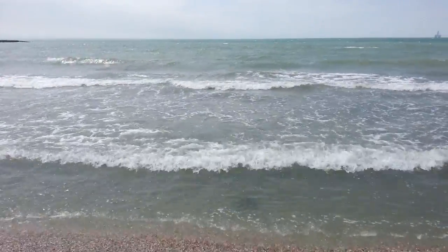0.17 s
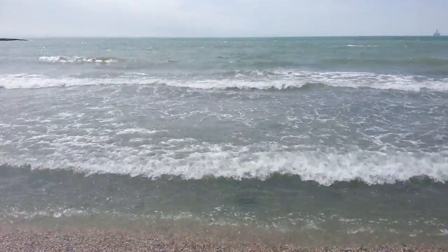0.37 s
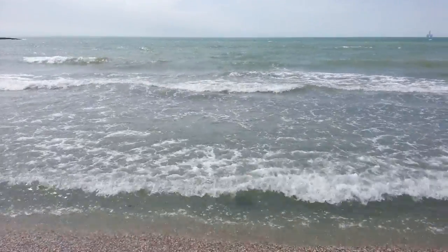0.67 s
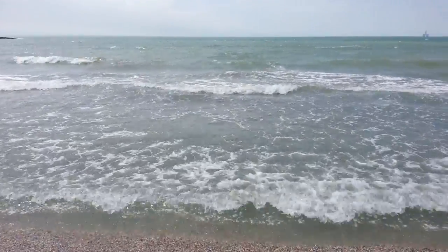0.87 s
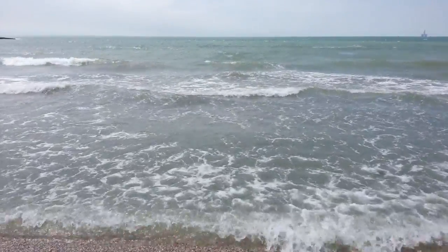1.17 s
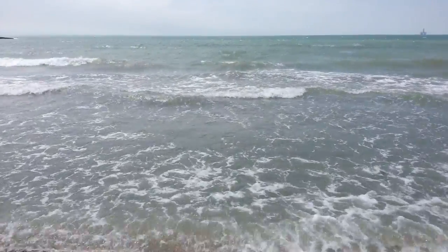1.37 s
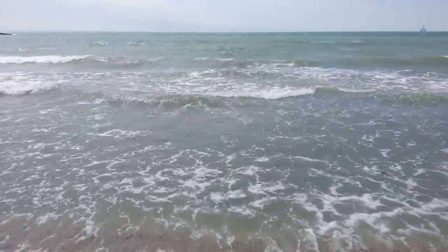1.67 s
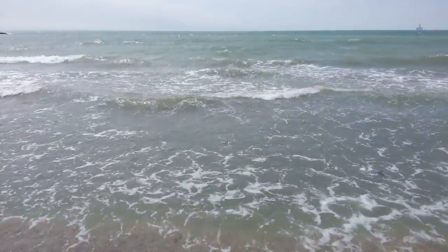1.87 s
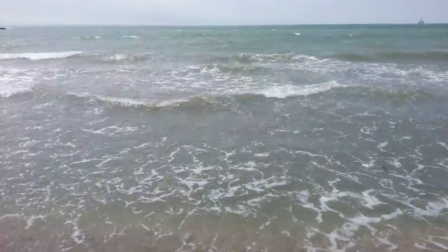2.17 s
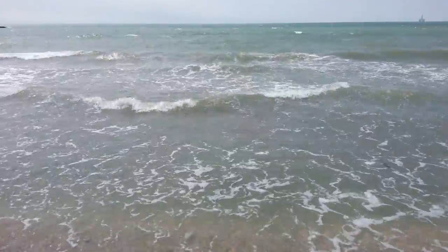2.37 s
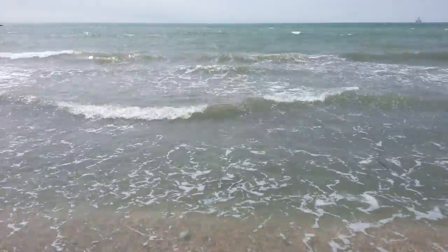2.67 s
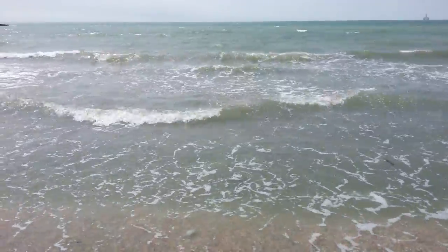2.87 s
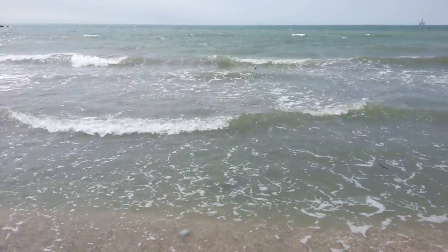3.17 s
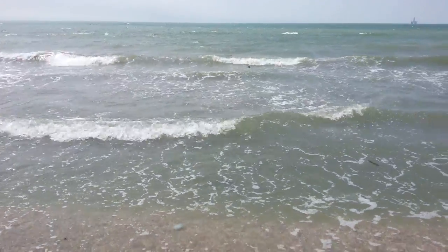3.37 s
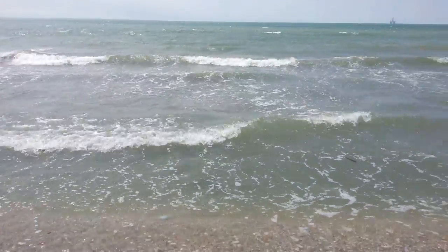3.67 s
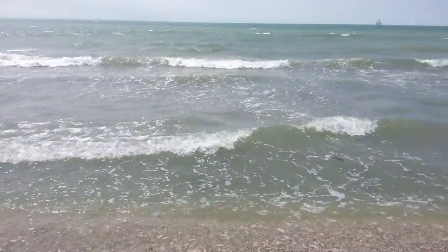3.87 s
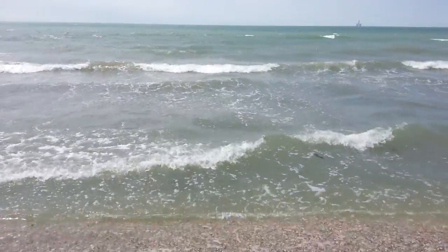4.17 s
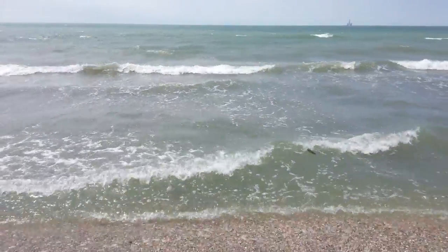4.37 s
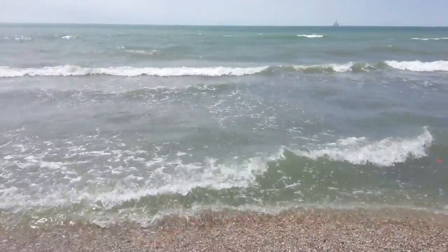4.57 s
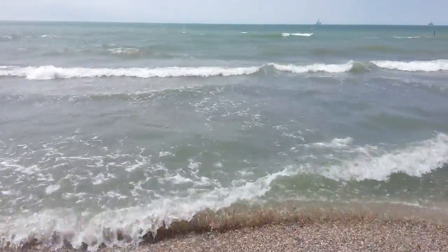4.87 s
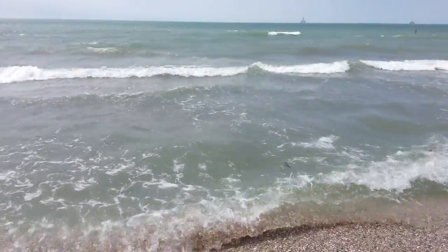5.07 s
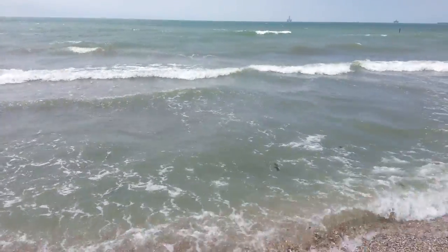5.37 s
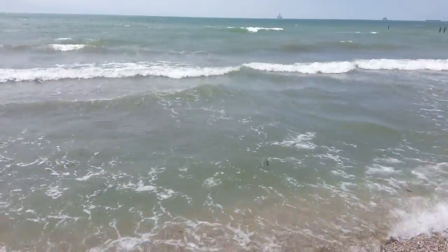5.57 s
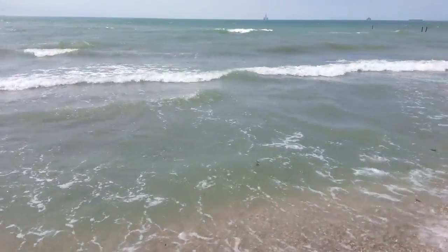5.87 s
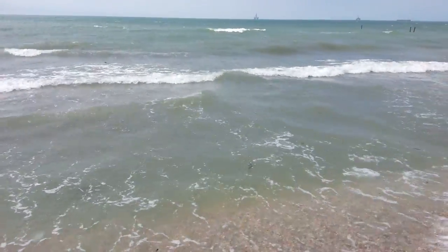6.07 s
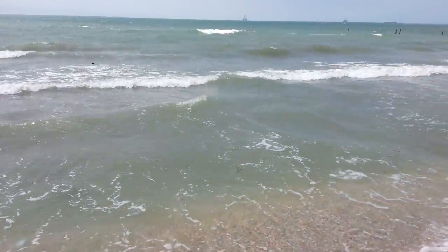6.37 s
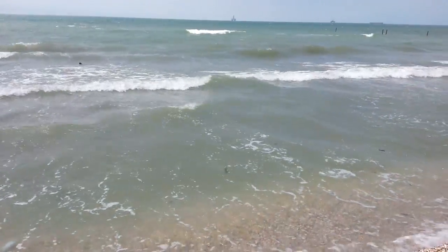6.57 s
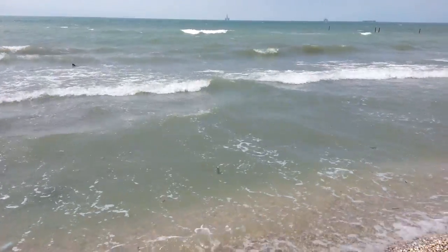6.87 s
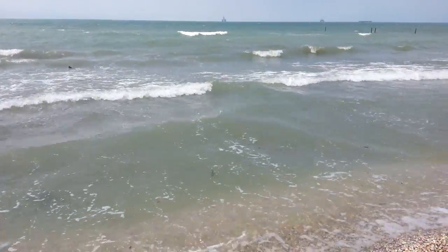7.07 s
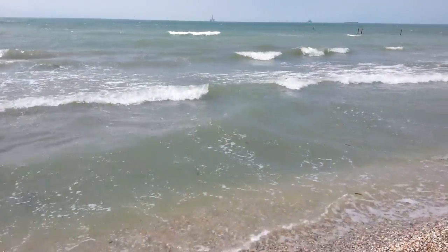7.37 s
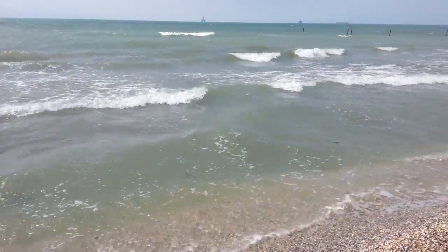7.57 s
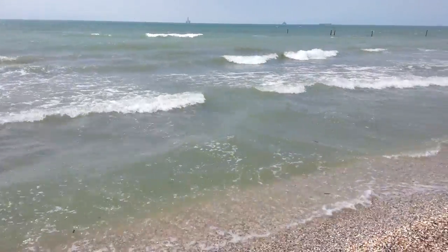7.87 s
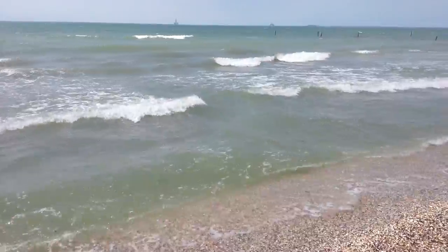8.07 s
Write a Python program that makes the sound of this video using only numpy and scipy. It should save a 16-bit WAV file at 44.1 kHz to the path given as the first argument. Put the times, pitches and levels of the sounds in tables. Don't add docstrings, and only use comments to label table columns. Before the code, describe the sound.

Small waves break and fizz on a shell and pebble beach while rising wind buffets the microphone, growing rough and gradually covering the surf.

```python
import sys
import numpy as np
from scipy import signal
from scipy.fft import rfft, irfft, next_fast_len
from scipy.io import wavfile
from scipy.ndimage import uniform_filter1d, map_coordinates

SR = 44100
rng = np.random.default_rng(int(sys.argv[2]) if len(sys.argv) > 2 else 0)


def linear_from_db(decibels):
    return 10 ** (np.asarray(decibels, float) / 20)


def generate_wav(signal):
    frames = np.transpose(np.atleast_2d(signal))
    scaled = np.clip(frames, -1, 1) * 32767
    pcm = np.round(scaled).astype(np.int16)
    wavfile.write(sys.argv[1], SR, pcm)


N = 362943

# time in seconds, level in dB.
SURF_LEVEL = [(0, -25), (1.0, -25), (1.2, -27), (1.4, -26), (1.6, -25.5), (2.05, -25), (2.2, -26.5),
              (2.8, -29), (3.6, -25.5), (3.8, -28), (4.85, -29.5), (4.98, -26.5), (5.6, -25.5),
              (5.7, -32.5), (5.8, -28.5), (6.1, -33.5), (7.2, -35.5), (8.23, -37.5)]
# centre in seconds, lift in dB, length in ms.
SPRAY_CRESTS = [
    (.4, 0.5, 170),
    (1.4, -1, 53),
    (1.9, 3, 330),
    (2.4, 2.5, 170),
    (5.0, 0.5, 140),
    (5.56, 3.5, 200),
    (6.3, -0.5, 40),
    (8.1, 1.5, 370),
]
# frequency in Hz, response in dB.
OPEN_PORT_COLOUR = [(60, -5.5), (250, -4), (700, 1), (1400, -3), (2000, -4.5), (2700, -3.5), (3300, -2),
                    (4000, -0.5), (5000, -4), (6000, -11.5), (7500, -8.5), (9500, -13), (12500, -23.5),
                    (14600, -22), (14900, -62)]
SHADED_PORT_COLOUR = [(60, -15), (300, -11), (700, 1.5), (900, -4), (1700, -8), (2200, -5.5), (2600, -9),
                      (3000, -17), (5200, -25), (6300, -35), (7500, -27.5), (11500, -29.5), (12500, -72),
                      (15000, -83)]
# time in seconds, strength in dB, left over right in dB, gustiness in dB.
WIND_COURSE = [(0, -28, -4, 0), (.45, -25.5, 2, 1), (.85, -24, -3.5, -0.5), (1.15, -19.5, 6.5, 0.5),
               (1.5, -16.5, 10.5, 0), (1.7, -17, 17, -3), (2.2, -17, 14.5, -3), (2.6, -19, 9, 0),
               (2.85, -20, 6.5, 2), (3.4, -18, 12.5, 0), (3.65, -18, 8, -3), (4.3, -15.5, 16, 1),
               (4.9, -14.5, 11, -2), (5.25, -18.5, 13, 5), (5.37, -14.5, 6, -1.5), (6.3, -13.5, 4, 0),
               (7.0, -14, 2, -1), (8.23, -15, -2.5, -0.3)]
# frequency in Hz, level in dB per Hz.
BUFFET_SPECTRUM = [(20, -55), (45, -31), (130, -7), (200, -2), (290, -1), (420, -5), (600, -12.5),
                   (1000, -21), (2000, -91)]
# frequency in Hz, level in dB per Hz.
LEFT_RASP_SPECTRUM = [(150, -25), (400, 1.5), (600, 2), (900, -8), (1400, -17.5), (2500, -28), (6000, -58)]
RIGHT_RASP_SPECTRUM = [(150, -33), (450, 2.5), (700, 1), (1200, -3), (2000, -9.5), (3500, -19), (5000, -31),
                       (6500, -49), (12000, -82)]
# centre in seconds, level in dB, length in ms.
LEFT_PORT_PUFFS = [(0.062, -13.5, 16), (0.172, -21, 17), (0.501, -19, 29), (0.769, -13, 13),
                   (0.799, -11, 9), (2.409, -14, 14), (2.567, -8, 9.7), (2.592, -14, 8.8), (2.726, -10, 9),
                   (2.917, -14, 6.3), (3.029, -12, 24), (3.145, -4.5, 19), (3.725, -4, 8.1),
                   (3.803, -21, 10), (3.832, -7.5, 9.4), (3.861, -9, 7), (4.514, -3.5, 9.2),
                   (5.155, -6, 6.7), (5.35, -8, 10), (5.377, -6, 11), (6.846, -5, 9.3)]
RIGHT_PORT_PUFFS = [(0.032, -9.5, 11.5), (0.176, -12.5, 17), (0.305, -10.5, 14), (0.505, -10.5, 18),
                    (0.755, -13, 11), (1.476, -6, 11), (1.8, -17.3, 9), (2.119, -14, 11), (2.43, -12, 9.9),
                    (2.55, -10, 7.5), (2.603, -14, 9), (2.837, -10.5, 11), (2.933, -15, 24),
                    (3.556, -18, 9.1), (3.582, -16, 9), (3.612, -10, 13), (3.761, -10, 12),
                    (4.092, -10, 10), (4.228, -17, 13), (4.36, -12, 9), (4.474, -9, 11), (4.757, -10.5, 20),
                    (4.95, -7, 11), (4.985, -13, 6.6), (5.16, -16, 9), (5.342, -10, 19), (6.302, -11, 19),
                    (6.473, -4, 13), (7.048, -6.0, 45), (7.388, -9, 6.9)]
# onset in seconds, peak level in dB, length in ms.
BRIGHT_TEARS = [
    (5.3294, -12, 69),
    (5.8391, -13, 88),
    (6.3155, -7, 87),
    (6.6438, -11, 40),
    (6.8694, -9.5, 60),
    (7.1886, -8, 79),
    (7.3178, -3, 61),
    (8.0985, -25, 55),
]


def unit(x):
    return x / np.sqrt(np.mean(x ** 2, axis=-1, keepdims=True) + 1e-20)


def along(points, hz):
    f, value = np.transpose(points)
    return np.interp(np.log(hz + 1), np.log(f + 1), value)


def curves(rows):
    seconds, *columns = np.transpose(rows)
    return [np.interp(np.arange(N) / SR, seconds, column) for column in columns]


def wobble(rate):
    knots = rng.standard_normal(N // 64)
    return map_coordinates(knots, [np.arange(N) * rate / SR])


def filtered(x, response):
    size = next_fast_len(N + 8192)
    hz = np.fft.rfftfreq(size, 1 / SR)
    return irfft(rfft(x, size) * response(hz), size)[..., :N]


def dense_foam(patchy_db):
    spectrum = signal.stft(rng.standard_normal(N), nperseg=512)[2]
    field = uniform_filter1d(rng.standard_normal(spectrum.shape), size=8, axis=0)
    field = uniform_filter1d(field, size=10, axis=1)
    gain = linear_from_db(patchy_db * field / field.std())
    return unit(signal.istft(spectrum * gain, nperseg=512)[1][:N])


def near_bubbles(count, centre_hz, cycles, spread_db):
    when, size, pitch = rng.random((count, 3)).T
    hz = centre_hz * 2 ** (3 * (pitch - 0.5))[:, None]
    k = np.arange(160)
    turns = hz * k / SR
    ring = np.sin(2 * np.pi * turns * (1 + 0.093 * turns / cycles))
    tone = ring * np.exp(-turns / cycles) * np.sqrt(hz)
    tone = tone * linear_from_db(-spread_db * np.log(size + 0.00072))[:, None]
    places = (when * N).astype(int)[:, None] + k
    return unit(np.bincount(places.ravel(), tone.ravel())[:N])


def foam():
    near = near_bubbles(count=14000, centre_hz=3980, cycles=2.8, spread_db=3)
    return dense_foam(patchy_db=0.56) + linear_from_db(-12) * near


def surf():
    level_db, = curves(SURF_LEVEL)
    t = np.arange(N) / SR
    fizz_db = -0.5
    for centre, lift_db, ms in SPRAY_CRESTS:
        fizz_db = fizz_db + lift_db * np.exp(-0.5 * ((t - centre) / (ms / 2000)) ** 2)
    churn_db = 0.81 * wobble(8) + 0.5 * wobble(20)
    both = np.array([foam(), foam()])
    heard = filtered(both, lambda hz: linear_from_db([along(OPEN_PORT_COLOUR, hz), along(SHADED_PORT_COLOUR, hz)]))
    wash = filtered(heard, lambda hz: 1 / (1 + (hz / 6100) ** 16))
    fizz = heard - wash
    return linear_from_db(level_db + churn_db + 17) * (wash + linear_from_db(fizz_db) * fizz)


def puffs(rows, air):
    size, half = 4096, 2048
    out, k = np.zeros(N + size), np.arange(size)
    for centre, db, ms in rows:
        bell = np.exp(-0.5 * ((k - half) / (0.52 * ms * SR / 1000)) ** 2)
        wanted = round(centre * SR) - half
        start = max(wanted, 0)
        lost = start - wanted
        source = start % (N - size)
        piece = bell * air[:, source:source + size].sum(axis=0)
        piece = linear_from_db(db) * piece * np.linalg.norm(bell) / np.linalg.norm(piece)
        out[start:start + size - lost] += piece[lost:]
    return out[:N]


def port_wind(buffet_db, rasp_db, rasp, rows, lump_db, tear_db, puff_rasp_db):
    air = unit(filtered(rng.standard_normal((4, N)),
                        lambda hz: linear_from_db([along(BUFFET_SPECTRUM, hz), along(rasp, hz)] * 2)))
    lumps = lump_db * (0.9 * wobble(18) + wobble(45))
    thud = unit(linear_from_db(lumps) * air[0])
    tear = unit(linear_from_db(lumps + tear_db * wobble(140)) * air[1])
    gusts = linear_from_db(buffet_db) * (linear_from_db(0.5) * thud + linear_from_db(rasp_db + 2) * tear)
    return gusts + puffs(rows, air[2:] * linear_from_db([[0], [puff_rasp_db]]))


def wind():
    wind_db, veer_db, gusty_db = curves(WIND_COURSE)
    left_share = 1 / (1 + linear_from_db(-2 * veer_db))
    left_db, right_db = wind_db + 6 + 10 * np.log10([left_share, 1 - left_share])
    rasp_db = 1.26 * (right_db + 19) + gusty_db
    left_db = left_db + 0.3 * wobble(5)
    right_db = right_db - 1 + 0.3 * wobble(5)
    left = port_wind(left_db, rasp_db - 26 - left_db, LEFT_RASP_SPECTRUM, LEFT_PORT_PUFFS,
                     lump_db=0.95, tear_db=1.0, puff_rasp_db=-11.0)
    right = port_wind(right_db, rasp_db - 23 - right_db, RIGHT_RASP_SPECTRUM, RIGHT_PORT_PUFFS,
                      lump_db=1.0, tear_db=1.8, puff_rasp_db=-8.5)
    return np.array([left, right])


def tears():
    air = filtered(rng.standard_normal((1, N)),
                   lambda hz: linear_from_db(along(RIGHT_RASP_SPECTRUM, hz)) * hz / (hz + 900))
    air = air * linear_from_db(2.8 * wobble(150))
    return puffs([(onset + 0.03, db - 7.5, ms) for onset, db, ms in BRIGHT_TEARS], air)


def scene():
    gusts = wind()
    gusts[1] += tears()
    return surf() + gusts


def coarse_spectrum(x):
    size, grid = 1024, 432
    k, t = np.arange(size) + 0.5, np.arange(2 * size) + 0.5
    window = np.sin(np.pi * t / (2 * size))[:, None]
    basis = np.sqrt(2 / size) * window * np.cos(np.pi / size * np.outer(t + size / 2, k))
    padded = np.pad(x, ((0, 0), (2 * size - grid, 2 * size - (N - grid) % size)))
    blocks = padded.reshape(2, -1, size)
    lines = np.concatenate([blocks[:, :-1], blocks[:, 1:]], axis=2) @ basis
    power = np.mean(lines[:1, :, size // 8:] ** 2, axis=2, keepdims=True)
    treble_db = 10 * np.log10(uniform_filter1d(power, size=9, axis=1) + 1e-12)
    port_db = np.array([-31, -37])[:, None, None]
    step = linear_from_db(port_db + 11 * k / size + 0.55 * (treble_db - treble_db.mean()))
    rounded = np.sign(lines) * np.floor(np.abs(lines) / step + 0.4) * step
    frames = rounded @ basis.T
    first = np.pad(frames[..., :size], ((0, 0), (0, 1), (0, 0)))
    second = np.pad(frames[..., size:], ((0, 0), (1, 0), (0, 0)))
    return (first + second).reshape(2, -1)[:, 2 * size - grid:][:, :N]


def roll_off(x):
    return signal.sosfilt(signal.butter(12, 15200, fs=SR, output="sos"), x)


def record(dry):
    cut = filtered(dry, lambda hz: hz ** 2 / (hz ** 2 + 55 ** 2))
    clipped = cut / (1 + np.abs(cut / 1.01) ** 14) ** (1 / 14)
    mix = coarse_spectrum(clipped)
    return roll_off(mix)


dry = scene()
out = record(dry)
generate_wav(out)
```